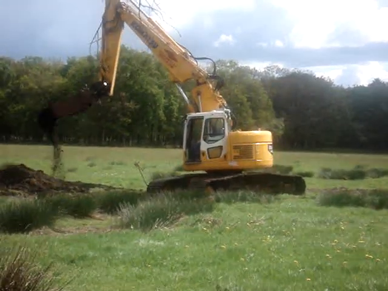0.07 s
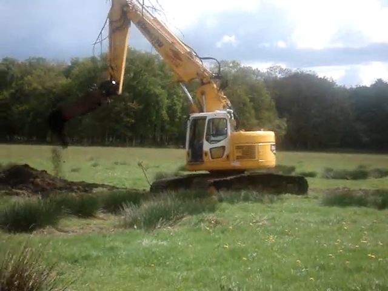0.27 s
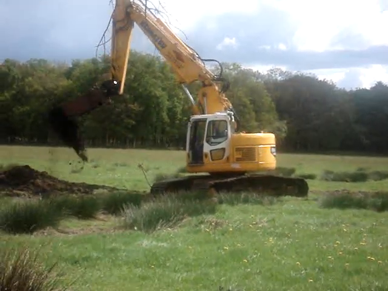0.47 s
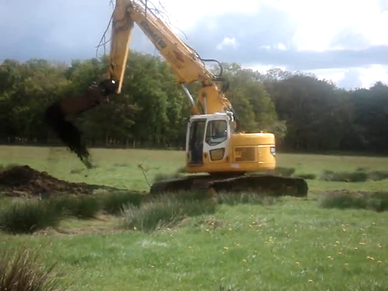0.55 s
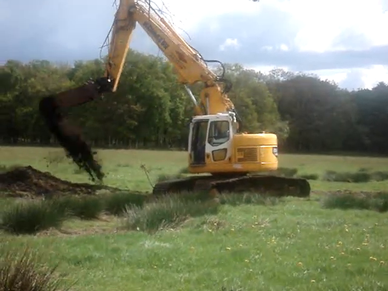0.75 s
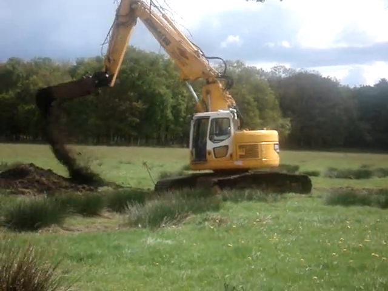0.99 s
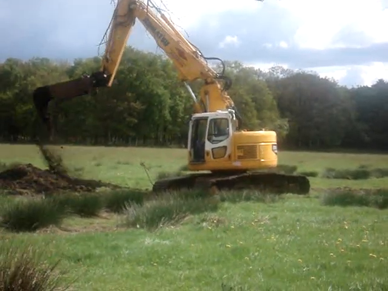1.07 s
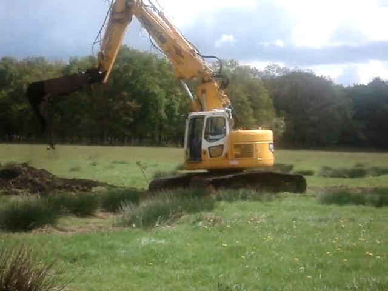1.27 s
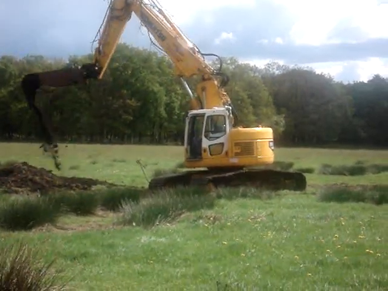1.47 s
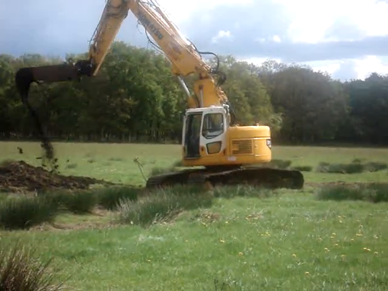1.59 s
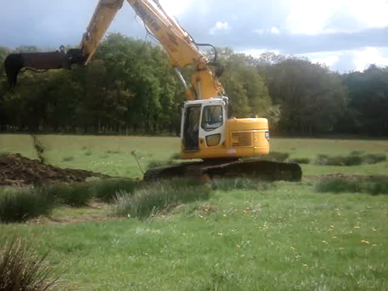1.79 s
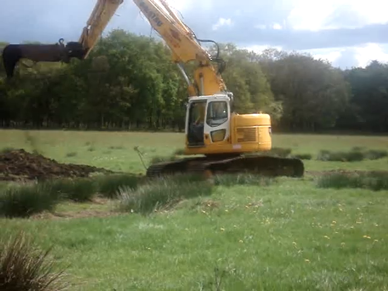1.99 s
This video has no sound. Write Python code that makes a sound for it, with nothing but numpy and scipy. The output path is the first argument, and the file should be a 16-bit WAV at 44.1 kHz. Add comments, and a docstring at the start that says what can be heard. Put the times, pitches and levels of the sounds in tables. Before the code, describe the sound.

An excavator bucket clanks and rattles loudly from about 0.2 to 0.7 seconds, the steel ringing briefly and ending in hollow knocks. A second, slightly softer bout runs from 1.0 to 1.5 seconds, then a sharp clank comes near 1.7 with smaller knocks after. Earth thuds down softly around 0.9, 1.0 and 1.8 seconds. A quieter diesel engine drones throughout, wavering slightly in the open air.

```python
"""Clanking, rattling steel over a diesel drone: an excavator shakes wet earth out of its bucket. The bucket
slams against its stops in three bouts and rattles in its pins; each blow sets its plates and shell ringing.
Clods knock hollow on the steel and thud down, and a link squeaks once. Underneath, the engine drones on, its
low end flickering in a little breeze; across the open field the tree line returns a faint wash."""
import sys
import numpy as np
from scipy import signal
from scipy.fft import rfft, irfft, next_fast_len
from scipy.io import wavfile

SR = 44100
rng = np.random.default_rng(int(sys.argv[2]) if len(sys.argv) > 2 else 0)


def unload_wav(signal):
    """Save mono or channel-first audio to the path in sys.argv[1] as 16-bit WAV at rate SR, clipped to [-1, 1]."""
    wavfile.write(
        sys.argv[1],
        SR,
        np.round(np.clip(np.atleast_2d(signal).T, -1, 1) * 32767).astype(np.int16),
    )


N = 90404

# Blows of the bucket; each struck spot favours two pitches: (time [s], rise [s], low pitch [Hz],
# high pitch [Hz], shell note [dB], bass [dB], middle [dB], treble [dB], top [dB])
BLOWS = [(0.233, 0.0053, 762, 2762, -32, -21, -18, -25, -31.5),
         (0.274, 0.0037, 339, 1390, -17, -26.5, -35, -34.5, -55),
         (0.289, 0.0068, 403, 1495, -26, -25, -28, -28, -37.5),
         (0.306, 0.0013, 848, 1084, -26, -27, -14, -24, -34),
         (0.346, 0.004, 795, 1137, -28, -27.5, -24, -55, -79),
         (0.36, 0.0026, 778, 2730, -19.5, -24, -28.5, -25, -36),
         (0.387, 0.0013, 876, 1784, -17, -32.5, -19, -23, -46),
         (0.398, 0.0012, 907, 1705, -26.5, -44, -29.5, -27, -39.5),
         (0.45, 0.0043, 402, 2300, -29, -26.5, -30, -28.5, -35),
         (0.474, 0.011, 458.5, 2530, -36, -28.5, -39, -45, -44.5),
         (0.535, 0.0066, 419, 990, -34.5, -39.5, -39.5, -43.5, -47),
         (0.601, 0.0092, 736, 1184, -51, -38, -39.5, -36.5, -44),
         (0.711, 0.0033, 766, 1590, -40.5, -43, -33, -42, -49),
         (0.988, .007, 493, 1295, -39, -27.5, -33, -44, -60),
         (1.019, 0.0032, 357.3, 1540, -36, -27.5, -51, -49, -64),
         (1.057, 0.0026, 427, 1470, -35, -30, -34.5, -36, -48.5),
         (1.105, 0.0022, 1131, 3330, -40, -42, -26.5, -29.5, -34),
         (1.112, 0.002, 775, 1070, -44, -30, -23.5, -32.5, -51),
         (1.143, .005, 403, 2300, -29, -29, -34, -33.5, -41),
         (1.172, 0.0063, 890, 2643, -25, -29.5, -29.5, -46, -58),
         (1.203, 0.0017, 838, 3090, -50, -30, -29.5, -33, -37.5),
         (1.221, 0.0019, 642, 1036, -41, -45.5, -35.5, -54, -57),
         (1.284, 0.003, 367, 1248, -34, -36.5, -44, -61, -71),
         (1.349, 0.0087, 387, 2270, -42, -32, -36.5, -35.5, -43.5),
         (1.371, 0.005, 423, 1980, -27, -36, -32.5, -34, -48),
         (1.395, 0.0033, 460, 2960, -29, -36.5, -38, -45.5, -47),
         (1.452, 0.0044, 320, 1993, -33, -41, -35.5, -37, -55),
         (1.666, 0.002, 880, 1465, -29, -22.5, -18, -20, -33.5),
         (1.766, 0.003, 1038, 2976, -56, -45, -32.5, -35, -42.5),
         (1.783, 0.0035, 843, 2580, -55, -36, -32.5, -31, -37.5)]


def bucket():
    """The bucket slams against its stops and rattles in its pins, blow by blow."""
    # Bounds of the bass, middle, treble and top bands: (edge [Hz])
    band_edges = [240, 580, 1450, 3800, 11000]
    filters = [signal.butter(3, edges, "band", fs=SR, output="sos")
               for edges in zip(band_edges, band_edges[1:])]
    out = np.zeros(N)
    for start, rise_s, low_hz, high_hz, _, *bands_db in BLOWS:
        add(out, start, blow(filters, rise_s, low_hz, high_hz, bands_db))
    return out


def blow(filters, rise_s, low_hz, high_hz, bands_db, crash_s=0.017, detune=0.0087, spread_db=4.5):
    """One slam: plates, modes and struck spot ring, each band as strong as the contact makes it."""
    # Tone of the steel plates' dense ringing: (frequency [Hz], relative level [dB])
    plate_tone = [(180, 4), (260, -6.5), (330, 4), (430, -6.5), (600, -1.5), (850, 2), (1050, -1),
                  (1700, -8.5), (1950, -10), (2900, -9), (3700, -19), (5500, -26.5), (7500, -27),
                  (10000, -39)]
    # The plates' highs die first: (frequency [Hz], t60 [s])
    plate_decay = [(200, 0.77), (500, 0.57), (1000, 0.36), (3000, 0.27), (9000, 0.097)]
    # Modes of the bucket: (frequency [Hz], relative level [dB], t60 [s])
    bucket_modes = [(340, -19.5, 0.1), (418.7, -4, 0.21), (482.2, -9, .3), (519.8, -18.5, 0.28),
                    (758, -2, 0.097), (823, -4, 0.1), (894, -11, 0.19), (1133.5, -6.5, 0.13),
                    (1340, -12.5, .22), (1486, -17, 0.14), (1697, -6, 0.12), (2157, -11, 0.12),
                    (2485, -8.5, 0.12), (2912, -9, 0.094)]

    def favour(hz, width=0.049):
        """Gain of two narrow peaks at the struck spot's pitches."""
        return amp(sum(db * np.exp(-((hz / centre - 1) / width) ** 2)
                       for db, centre in [(9, low_hz), (7, high_hz)]))

    size = 2 ** 14
    t, freqs = np.arange(size) / SR, np.fft.rfftfreq(size, 1 / SR)
    attack = t < 0.025  # layers and bands are balanced over this opening
    noise = irfft(rfft(rng.standard_normal(size)) * amp(read(plate_tone, freqs)) * favour(freqs))
    bin_hz, age, frames = signal.stft(noise, SR, nperseg=256)
    frames = frames * amp(-60 * age / read(plate_decay, bin_hz)[:, None])
    plates = signal.istft(frames, SR, nperseg=256)[1][:size]
    plates *= 1 + np.exp(-t / crash_s)  # a first crash stands above the ringing
    modes = np.zeros(size)
    for hz, db, t60 in bucket_modes:
        mode_hz = hz * (1 + detune * rng.standard_normal())
        mode_db = db + spread_db * rng.standard_normal()
        modes += favour(hz) * ring(t, mode_hz, mode_db, t60)
    spot = 2 * (ring(t, low_hz, db=-2, t60=0.18) + ring(t, high_hz, db=-12.5, t60=0.055))
    steel = plates / rms(plates[attack]) + amp(-4.5) * modes / rms(modes[attack]) + spot
    steel *= np.minimum(t / rise_s, 1)
    bands = [signal.sosfilt(sos, steel) for sos in filters]
    return sum(amp(db) * band / rms(band[attack]) for db, band in zip(bands_db, bands))


def shell(hz=306.3, rise_s=0.012, t60=0.24):
    """The blows pile up in the shell's deep note, which rings on between them."""
    age, power = np.arange(SR // 2) / SR, np.zeros(N)
    envelope = np.minimum(age / rise_s, 1) * decay(age, t60)
    for start, _, _, _, shell_db, *_ in BLOWS:
        add(power, start, (amp(shell_db) * envelope) ** 2)
    return np.sqrt(2 * power) * rough_note(hz, depth=0.37, rate_hz=18)


def hollow_knocks():
    """Clods knock hollow on the steel, and a link squeaks once on its pin; each rings with one rough note."""
    # Hollow knocks of clods, then the link's squeak: (time [s], pitch [Hz], level [dB], rise [s], t60 [s])
    knocks = [(0.601, 797, -26, 0.0017, 0.37), (0.711, 744, -29, 0.0064, .09),
              (0.728, 646.3, -28.5, 0.0048, 0.29), (1.780, 2918, -29.5, 0.017, 0.15)]
    out, t = np.zeros(N), np.arange(N) / SR
    for start, hz, db, rise_s, t60 in knocks:
        envelope = np.minimum(t / rise_s, 1) * decay(np.maximum(t - rise_s, 0), t60)
        add(out, start, amp(db) * envelope * rough_note(hz, depth=0.27, rate_hz=70))
    return out


def clods():
    """Each clod of wet earth lands with one short, low push."""
    # Landings: (time [s], pitch [Hz], level [dB], length [s])
    thuds = [(0.921, 190, -28.5, 0.0125), (1.047, 94, -23, 0.021), (1.785, 82.5, -26, 0.018)]
    out = np.zeros(N)
    for start, hz, db, length in thuds:
        t = np.arange(0, length, 1 / SR)
        push = np.sin(np.pi * t / length) ** 2
        add(out, start, amp(db) * push * np.cos(2 * np.pi * hz * (t - length / 2)))
    return out


def engine(waver=0.008, waver_db=1.5, waver_hz=12, clatter=0.19, flicker_db=2, flicker_hz=20):
    """A wavering diesel hum in a drone of fan and exhaust, whose low end flickers in the breeze."""
    # Engine speed: (time [s], firing rate [Hz])
    firing_rate = [(0, 72), (0.6, 76.7), (1.0, 71.4), (1.27, 74.5), (1.55, 88.6), (1.8, 71), (2.05, 56)]
    # Partials of the hum: (multiple of the firing rate, level before load [dB])
    orders = [(.5, -58.5), (1, -48), (1.5, -52), (2, -47), (2.5, -50.5), (3, -59.5), (4, -58.5)]
    # The hum swells and sinks with the load: (time [s], gain [dB])
    load = [(0, 0.5), (.5, 3), (.85, -6.5), (1.1, 2), (1.45, -13), (1.8, 2), (2.05, -9.5)]
    # Tone of fan and exhaust: (frequency [Hz], relative level [dB])
    drone_tone = [(15, -27), (40, -17.5), (75, -7.5), (130, -7), (200, -9.5), (305, -13), (440, -17.5),
                  (570, -18.5), (840, -16.5), (1010, -23.5), (1240, -18), (2030, -26), (2600, -25.5),
                  (4500, -33.5), (7000, -40.5), (10000, -46)]
    t = np.arange(N) / SR
    firing_hz = np.interp(t, *np.transpose(firing_rate)) * (1 + waver * wander(waver_hz))
    firings = np.cumsum(firing_hz) / SR
    hum = np.zeros(N)
    for order, db in orders:
        peak = np.sqrt(2) * amp(db + waver_db * wander(waver_hz))
        hum += peak * np.sin(2 * np.pi * (order * firings + rng.random()))
    hum *= amp(np.interp(t, *np.transpose(load)))
    pulsing = 1 + clatter * np.cos(2 * np.pi * firings)
    drone = colour(rng.standard_normal(N) * pulsing, drone_tone)
    low_end = signal.sosfiltfilt(signal.butter(2, 600, fs=SR, output="sos"), drone)
    drone += low_end * (amp(flicker_db * wander(flicker_hz)) - 1)
    return hum + amp(-38.5) * drone / rms(drone)


def field_wash(sound, build_s=0.049, t60=0.57, cutoff_hz=2500):
    """A dull, faint wash scattered back from the machine and the trees."""
    t = np.arange(SR) / SR
    tail = rng.standard_normal(SR) * np.minimum(t / build_s, 1) * decay(t, t60)
    tail = signal.lfilter(*signal.butter(1, cutoff_hz, fs=SR), tail / np.linalg.norm(tail))
    return amp(-13) * signal.fftconvolve(sound, tail)[:N]


def ring(t, hz, db, t60):
    """One dying mode at a random phase."""
    return amp(db) * decay(t, t60) * np.sin(2 * np.pi * (hz * t + rng.random()))


def rough_note(hz, depth, rate_hz):
    """A sine that trembles in level and phase."""
    t = np.arange(N) / SR
    tremble = 1 + depth * wander(rate_hz)
    return tremble * np.sin(2 * np.pi * hz * t + depth * wander(rate_hz))


def wander(hz):
    """Random drift up to about the given rate, rms 1."""
    size = next_fast_len(N, True)
    rolloff = 1 + (np.fft.rfftfreq(size, 1 / SR) / hz) ** 4
    drift = irfft(rfft(rng.standard_normal(size)) / rolloff, size)[:N]
    return drift / rms(drift)


def decay(t, t60):
    """A fade that falls 60 dB in t60 seconds."""
    return np.exp(-np.log(1000) * t / t60)


def colour(x, points):
    """Equalises a sound along a curve of (frequency [Hz], gain [dB])."""
    return irfft(rfft(x) * amp(read(points, np.fft.rfftfreq(len(x), 1 / SR))), len(x))


def read(points, hz):
    """Reads a curve on a log-frequency axis."""
    freqs, values = np.transpose(points)
    return np.interp(np.log(hz + 1), np.log(freqs + 1), values)


def add(mix, start, sound):
    """Mixes a sound in at a start time in seconds."""
    part = mix[max(round(start * SR), 0):][:len(sound)]
    part += sound[:len(part)]


def amp(db):
    """Decibels to gain."""
    return 10 ** (np.asarray(db) / 20)


def rms(x):
    """Root mean square."""
    return np.sqrt(np.mean(x ** 2) + 1e-20)


def scene():
    """Clanking steel, its wash and the falling clods over the engine, in mono."""
    steel = bucket() + shell() + hollow_knocks()
    return (steel + field_wash(steel) + clods() + engine())[None]


def record(dry):
    """A steep high cut at 10.1 kHz takes off the very top."""
    high_cut = signal.firwin(511, 10100, window=("kaiser", 9), fs=SR)
    return signal.oaconvolve(dry, high_cut[None], "same")


dry = scene()
out = record(dry)
unload_wav(out)
```